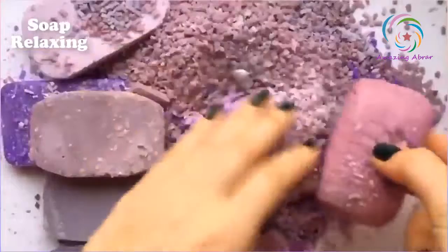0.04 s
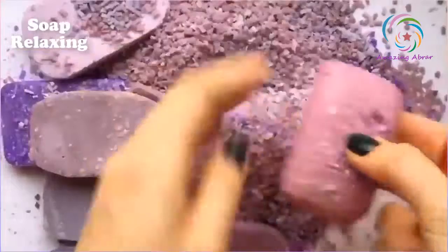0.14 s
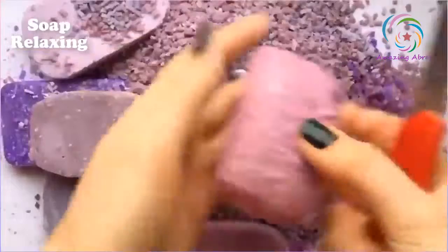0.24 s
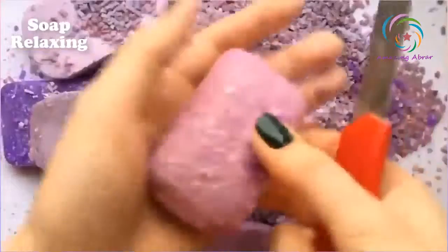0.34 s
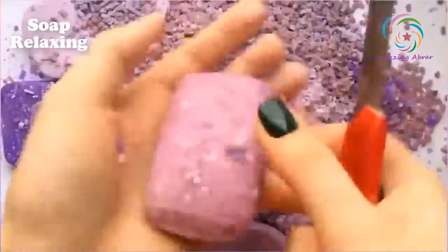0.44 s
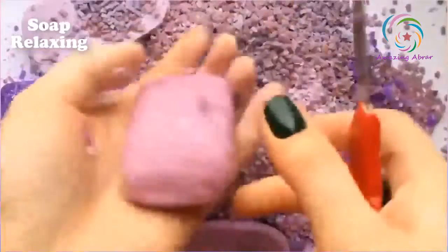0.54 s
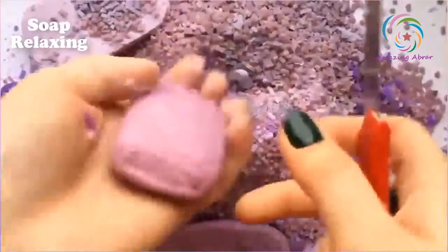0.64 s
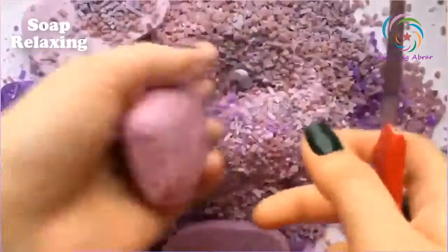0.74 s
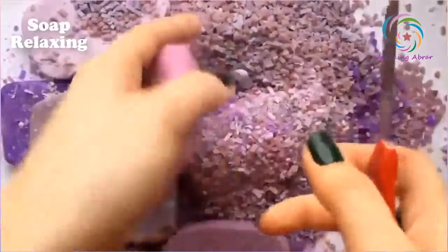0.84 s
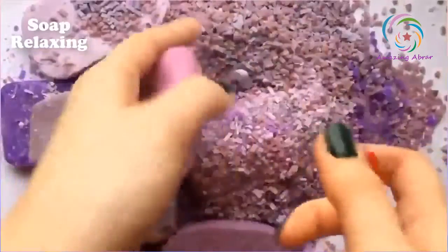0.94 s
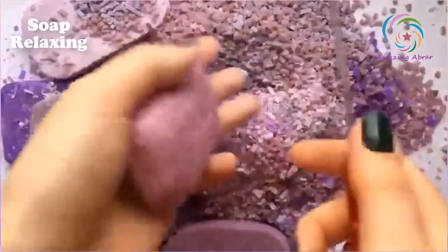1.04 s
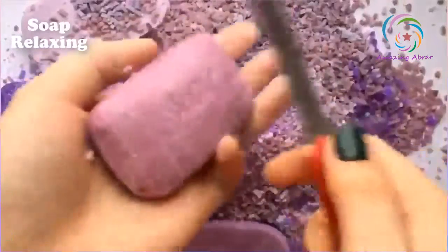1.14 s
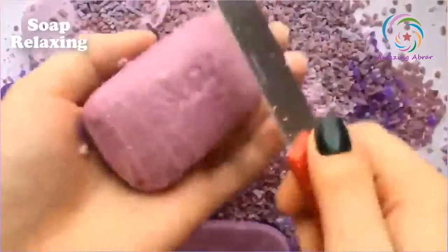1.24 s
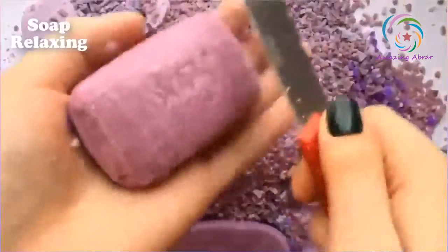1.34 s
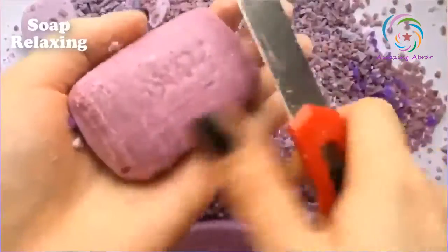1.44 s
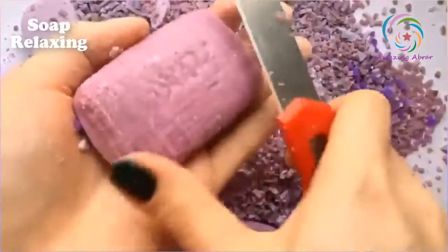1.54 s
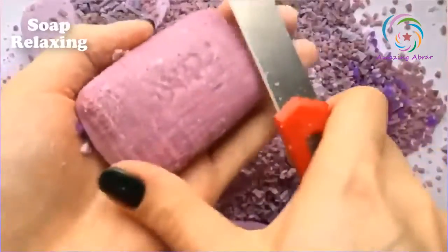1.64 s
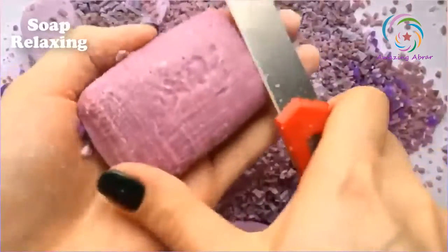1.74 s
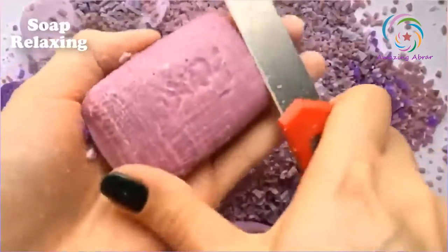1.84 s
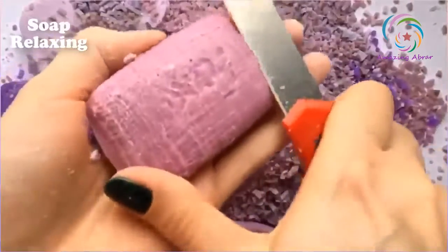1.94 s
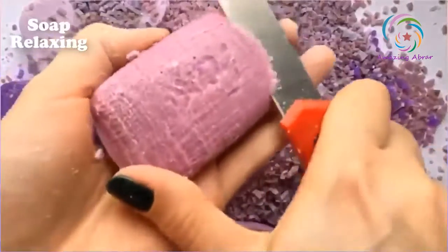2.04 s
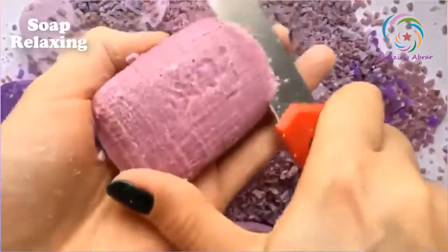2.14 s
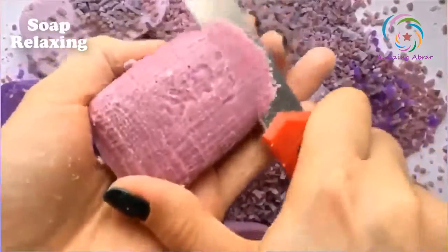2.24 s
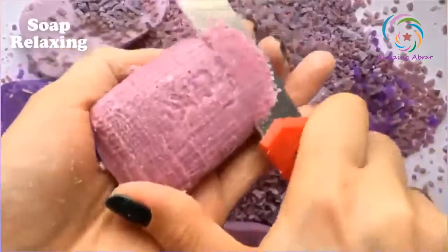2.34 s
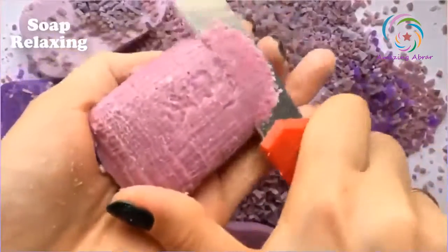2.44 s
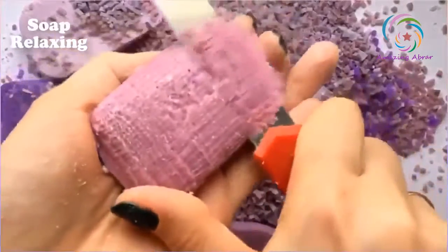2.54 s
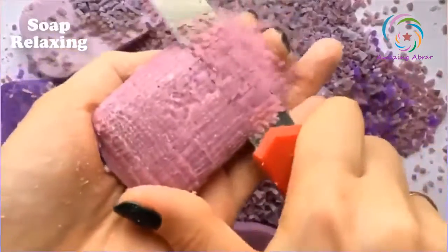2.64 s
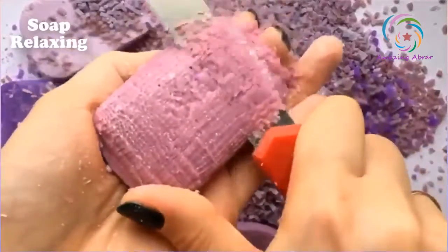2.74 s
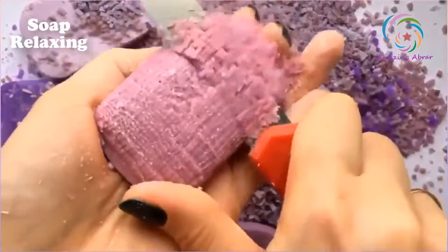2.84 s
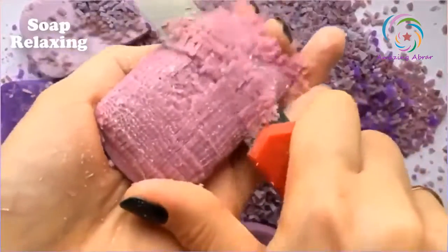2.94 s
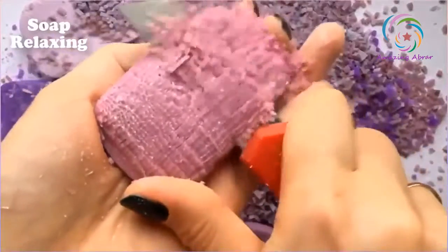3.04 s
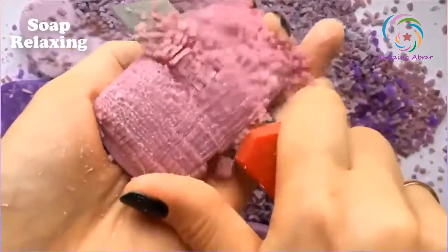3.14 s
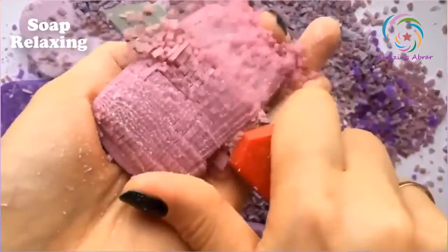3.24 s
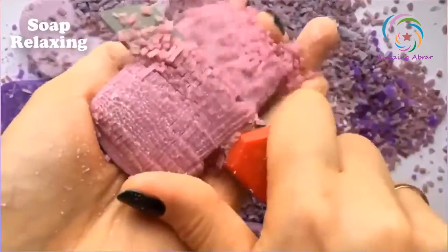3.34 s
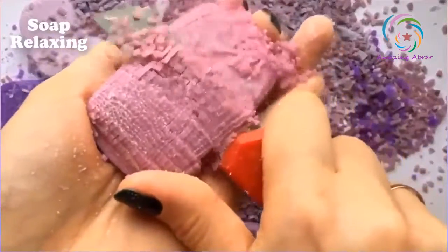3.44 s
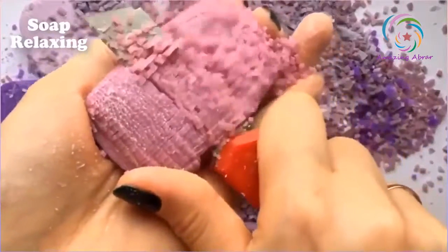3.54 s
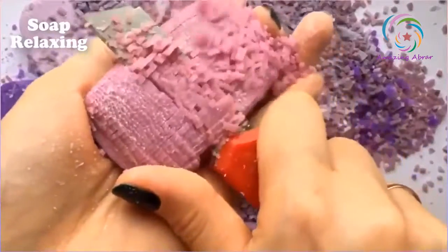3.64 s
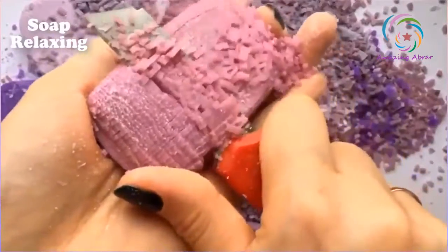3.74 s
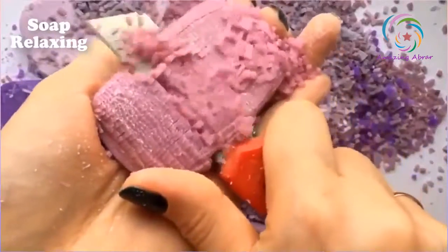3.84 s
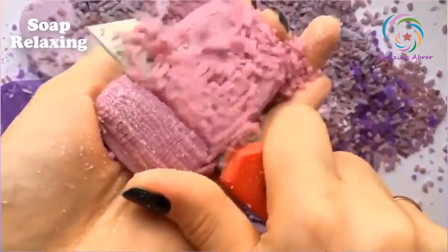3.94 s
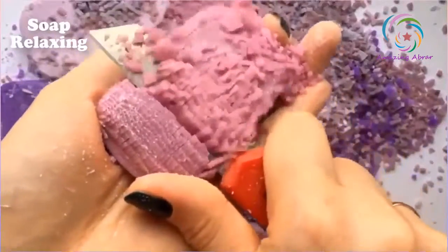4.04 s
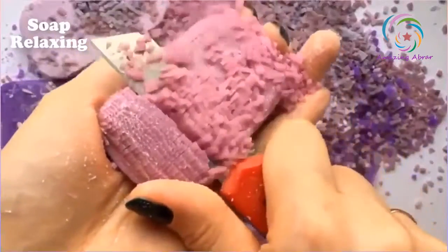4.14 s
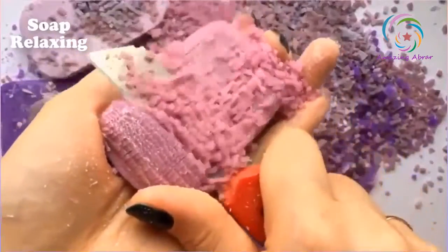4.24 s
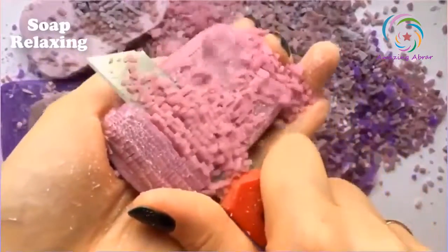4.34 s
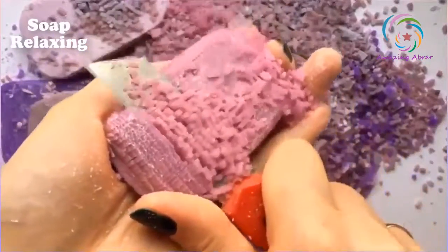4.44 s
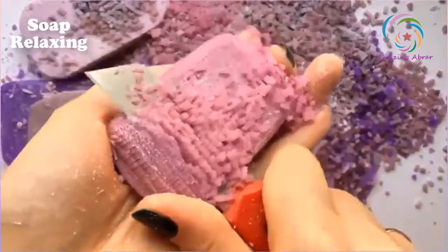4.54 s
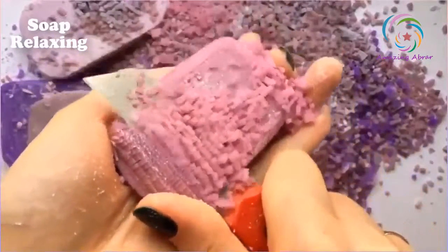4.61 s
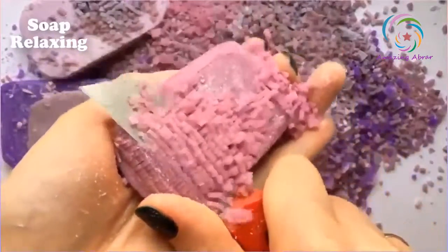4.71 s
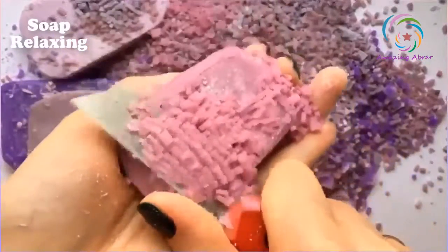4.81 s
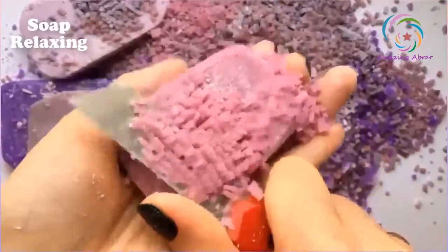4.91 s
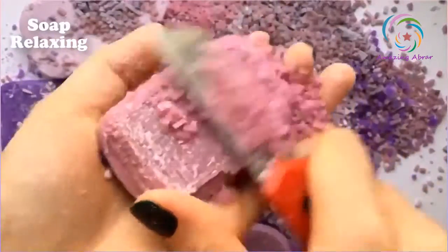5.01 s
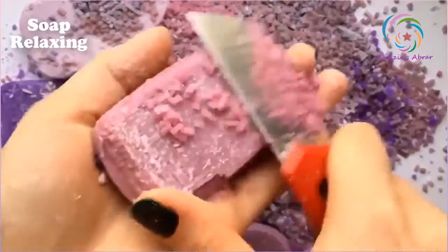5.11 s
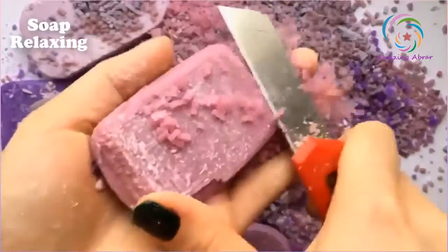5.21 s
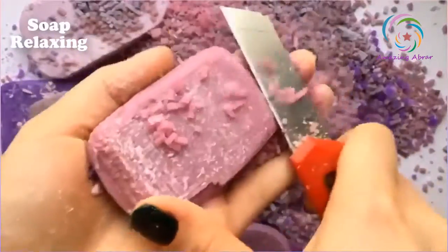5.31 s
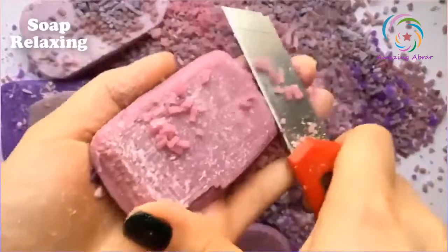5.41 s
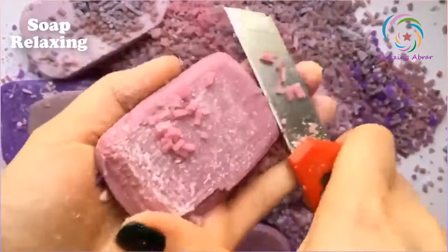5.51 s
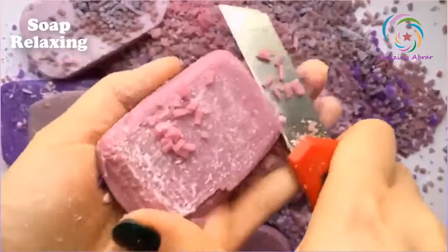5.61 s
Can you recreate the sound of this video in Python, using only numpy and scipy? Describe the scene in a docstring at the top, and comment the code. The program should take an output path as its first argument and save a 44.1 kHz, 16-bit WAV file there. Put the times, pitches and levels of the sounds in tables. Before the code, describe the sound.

Very close, dry recording of hands and soap. Soft skin rubbing, low bumps and small taps come first, then a stuttering scrape as the knife bites in. Dense brittle crunches follow in uneven clusters, thinning out to separate snaps. At the end come a quick blade hiss, sharp taps and trickling crumbs over faint low room noise.

```python
"""A blade is pushed through a dry, cross-scored bar of soap: a fine stick-slip scrape, then crunches
as rows of cubes snap off, built from avalanches of tiny fractures coloured by bar, edge and pieces.
Skin noise, light knocks and damped low bumps come before the cut; a few bumps and knocks return late.
At the end the blade swishes back as hiss in its high modes, and crumbs trickle down as short ticks.
Low filtered room noise lies under it all."""
import sys
import numpy as np
from scipy import signal
from scipy.fft import rfft, irfft
from scipy.io import wavfile

SR = 44100
rng = np.random.default_rng(int(sys.argv[2]) if len(sys.argv) > 2 else 0)


def master_out(mix):
    """Clip the mix to full scale and print it as 16-bit PCM to the path in sys.argv[1]."""
    frames = np.transpose(np.atleast_2d(mix))
    ceiling = np.clip(frames, -1, 1)
    pcm = np.round(ceiling * 32767).astype(np.int16)
    wavfile.write(sys.argv[1], SR, pcm)


N = 250047
TIME = np.arange(N) / SR
FFT_SIZE = 4096
BIN_HZ = np.fft.rfftfreq(FFT_SIZE, 1 / SR)

# Event and curve levels are nominal: some layers carry a further trim.
# Skin sliding on the whole bar. Each row: time in seconds, hiss level in dB, body level in dB.
RUB_BEFORE = [(0, -60, -60), (.11, -67, -55.5), (.2, -59, -49.5), (.38, -70.5, -63.5), (.68, -74, -72),
              (.93, -69, -78), (1.15, -74.5, -74.5), (2.25, -78, -84)]
# Skin sliding on the cut bar. Each row: time in seconds, grit level in dB, body level in dB.
RUB_AFTER = [(5.18, -74, -80), (5.3, -62, -67.5), (5.52, -56.5, -59), (5.67, -63, -62.5)]
# Nails, blade and crumbs knocking on the bar. Each row: middle in seconds, level in dB,
# length in seconds, ring in Hz, body boost in dB.
TAPS = [(0.082, -51, 0.029, 10800, 12), (0.175, -54, 0.017, 980, 46), (.448, -51, 0.0028, 2430, 29),
        (0.549, -61.5, 0.0045, 2400, 28), (0.602, -61.5, 0.019, 2240, 18), (0.795, -49, .0044, 8900, -8),
        (.844, -59, 0.0036, 2250, 19), (1.128, -51, 0.0097, 9400, 16), (1.384, -46, 0.0085, 4400, 6.5),
        (1.454, -53.5, 0.026, 2680, 8), (1.5817, -41.5, 0.0018, 4450, 23), (1.582, -48, .0038, 1230, 13),
        (1.681, -48.5, 0.011, 6640, 14), (1.7626, -51, 0.0065, 7300, 6), (1.805, -56.5, 0.017, 8660, -15),
        (1.9866, -45, 0.0049, 970, 17.5), (2.159, -44, 0.0034, 5830, -12), (5.359, -32, 0.0043, 7260, 5.5),
        (5.4205, -45, 0.0055, 2480, 11), (5.46, -54.5, 0.025, 1700, 29), (5.497, -39.5, 0.0042, 4320, 16.5),
        (5.557, -43, 0.017, 5300, 16.5)]
# Soft bumps of hand and bar. Each row: start in seconds, level in dB, pitch in Hz,
# scuff rms as a share of the swing's peak.
THUMPS = [(.17, -43.5, 304, 0.99), (0.185, -41, 125, 0.31), (.202, -32.5, 232, 0.17),
          (.237, -36.5, 249, 0.3), (4.581, -43.5, 175, 0.46), (4.648, -44.5, 173, 0.15),
          (4.849, -45, 165, 0.079)]
# The edge's first long bite into the bar. Each row: time in seconds, level in dB.
BITE = [(2.23, -80), (2.262, -52), (2.41, -55), (2.445, -44), (2.468, -32.5), (2.54, -28), (2.575, -35.5),
        (2.605, -54)]
# Rows of cubes snapping off. Each row: middle in seconds, level in dB,
# length in seconds (played as 1 ms at least), body boost in dB.
CRUNCHES = [(2.355, -41.5, 0.0024, 9), (2.4235, -35, 0.0062, -3), (2.5834, -27.5, 0.005, -11),
            (2.5927, -29.5, .004, -16), (2.617, -26, 0.0057, -3), (2.707, -35, 0.0023, -10),
            (2.764, -21.5, 0.0062, -2), (2.785, -24.5, 0.012, -0.5), (2.82, -26.5, 0.0097, 3),
            (2.8375, -21.5, 0.01, 3.5), (2.8554, -23, 0.0064, -6), (2.875, -28.5, .014, -0.5),
            (3.0373, -24, 0.0052, 1), (3.0647, -23, 0.0052, -4.5), (3.0767, -22.5, 0.0069, 1.5),
            (3.0913, -30, 0.0079, -2), (3.185, -27, 0.0078, -8.5), (3.205, -25, 0.0043, -12),
            (3.228, -26.5, 0.0065, -2.5), (3.273, -24.5, 0.0084, 3), (3.3162, -31.5, 0.0035, -15),
            (3.3328, -25.5, 0.0037, -6), (3.3424, -25.5, 0.0055, 1.5), (3.359, -26.5, 0.018, 1),
            (3.387, -24, 0.0052, 2.5), (3.481, -28.5, 0.00079, -12), (3.495, -23.5, 0.0065, 1),
            (3.5315, -27.5, 0.017, 2), (3.603, -44.5, 0.022, -6), (3.628, -28.5, 0.0024, -24),
            (3.65, -31.5, 0.011, 2.5), (3.661, -37, 0.0024, 7), (3.72, -20.5, 0.0033, -1.5),
            (3.758, -28, 0.0058, 1), (3.7696, -19.5, 0.0063, 0), (3.7823, -25.5, 0.0037, -1.5),
            (3.9931, -33, 0.0021, -17), (4.02, -41, 0.0049, -5), (4.1172, -25.5, 0.0088, 5),
            (4.1715, -36, .0025, 1), (4.2395, -29, 0.003, -4), (4.2481, -17, 0.0044, -1.5),
            (4.4333, -34.5, 0.002, -22), (4.464, -31, 0.00079, -19), (4.4889, -23.5, 0.0048, 6),
            (4.5093, -31.5, 0.012, 2.5), (4.57, -32, 0.0041, 5), (4.7622, -33, 0.011, 0),
            (4.775, -34.5, 0.0073, 6.5), (4.9065, -33.5, 0.0043, 3), (4.918, -43.5, 0.016, 11),
            (4.966, -47.5, 0.011, 9), (5.102, -41.5, 0.013, 1), (5.162, -45, 0.0018, -3)]
# How the resonances drift as the blade travels. Each row: time in seconds, bar ring in Hz,
# bar ring in dB, edge ring in dB, usual ring of the pieces in Hz.
TRAVEL = [(2.5, 2160, -3, 3.5, 5560), (2.85, 2180, 7, 6, 4570), (3.15, 2220, 8, -3, 4900),
          (4.2, 1730, 12.5, -1.5, 5800), (4.6, 1086, 9, -1.5, 5940)]
# The blade dragging on among loose crumbs. Each row: time in seconds, level in dB.
SCRAPE = [(2.6, -53), (2.7, -66.5), (3.0, -61), (3.15, -56), (3.55, -49), (4.0, -54), (4.7, -59.5),
          (5.1, -53.5), (5.2, -59.5)]

# Colours of skin hiss, skin body, room rumble, knocks, snaps and the dragging blade.
# Each row: frequency in Hz, relative level in dB.
SKIN_HISS = [(900, -14.5), (2400, 3), (4500, 1.5), (7000, 1.5), (9000, 0.5), (12000, -4.5)]
SKIN_BODY = [(80, -4.5), (230, 12), (500, -2), (1000, -5.5), (1600, -9.5), (3000, -11), (8000, -41)]
RUMBLE = [(12, -35), (20, -6), (43, 1), (96, -5), (151, 1), (206, -5.5), (225, -15), (380, -14.5),
          (464, -27), (517, -17.5), (566, -31), (619, -18), (677, -28), (990, -29), (1500, -30.5),
          (1950, -32.5), (3300, -120)]
KNOCK = [(100, -81), (500, -18), (1100, -16.5), (1700, -18), (2500, -6), (4300, 0.5), (6000, -0.5),
         (7200, 0), (8500, -6), (12000, -4.5)]
SNAP = [(60, -29.5), (170, -9.5), (350, -22.5), (700, -16), (1200, -19.5), (2000, -13), (2900, -10),
        (4400, -3.5), (5500, 1.5), (6600, -1.5), (8000, -7), (9900, -4), (10600, -12), (11900, -7.5)]
DRAG = [(150, 9), (400, -1.5), (1200, -5), (2200, 1.5), (3200, -1), (5000, 3.5), (6500, 4.5), (8000, -2),
        (10000, 1.5), (10600, -9), (11900, -3)]
# Steady resonances of the bar, then of the swishing blade.
# Each row: frequency in Hz, width in Hz, height in dB.
BAR_MODES = [(3447, 390, 6), (4340, 440, 4), (6040, 300, -1.5), (6640, 370, 1.5)]
SWISH_MODES = [(7030, 690, -7), (7500, 260, -5), (10000, 700, -17), (11400, 600, -19)]
# Response of the highest treble. Each row: frequency in Hz, gain in dB.
TREBLE_RESPONSE = [(11900, 0), (12150, -5), (12400, -35), (13200, -23), (14200, -35), (14600, -51)]
BAND_LIMIT_HZ = 14982

# The higher a knock rings, the more fizz it has.
TAP_USUAL_HZ, TAP_FIZZ_DB, TAP_FIZZ_DB_PER_OCTAVE = 4400, 1.2, 2.5
THUMP_T60_S = 0.077
# The edge sings in the bite, this far below the bite curve.
SING_DB = -18
# The blade quivers when it jumps free.
QUIVER_S, QUIVER_DB, QUIVER_T60_S = 4.25, -49, 0.41
# The longer a crunch, the more fizz and ring it has; each piece rings a little off the usual pitch.
USUAL_LENGTH_S, PITCH_SCATTER_OCTAVES = 0.0064, 0.18
FIZZ_DB, FIZZ_DB_PER_DOUBLING = 1.9, 2
RING_DB, RING_DB_PER_DOUBLING = 7.5, 0.5
# The bar's lower resonance follows the upper one.
LOW_MODE_SHARE_OF_PITCH, LOW_RING_DB = 0.247, 6.5
# Every crunch sheds crumbs that rustle on: level against the crunch, decay to 1/e.
SHED_DB, SHED_S = -25, 0.02
# The flat of the blade slides back over the cut face, swelling and fading around one moment.
SWISH_S, SWISH_DB, SWISH_RISE_DB_PER_S, SWISH_FALL_DB_PER_S = 5.35, -47.5, 163, 170


def amp(db):
    """Decibels to gain."""
    return 10 ** (np.asarray(db) / 20)


def unit(x):
    """Scales to rms 1."""
    return x / np.sqrt(np.mean(x ** 2) + 1e-20)


def read(points, hz):
    """A colour in dB, joined on a log-frequency axis."""
    f, db = np.transpose(points)
    return np.interp(np.log(hz + 1), np.log(f + 1), db)


def level(rows, axis=1):
    """One dB column of a curve as a gain, practically silent outside its span."""
    rows = np.asarray(rows)
    return amp(np.interp(TIME, rows[:, 0], rows[:, axis], left=-140, right=-140))


def peak(hz, width):
    """A resonance of height 1."""
    return 1 / (1 + (2 * (BIN_HZ - hz) / width) ** 2)


def add(mix, s, sound):
    """Mixes a sound in at time s."""
    part = mix[max(round(s * SR), 0):][:len(sound)]
    part += sound[:len(part)]


def ring(x, db):
    """Passes x through a causal, minimum-phase body with the given dB response."""
    cepstrum = irfft(np.maximum(db, -100) * np.log(10) / 20)
    # folding the cepstrum forward puts all the ringing after the strike
    cepstrum[1:FFT_SIZE // 2] *= 2
    cepstrum[FFT_SIZE // 2 + 1:] = 0
    response = irfft(np.exp(rfft(cepstrum)))
    return signal.fftconvolve(x, response)[:len(x)]


def grains(size, per_s, spread_db, hiss):
    """Tiny fractures of uneven strength over a fine hiss, rms 1."""
    chance, strength = rng.random(size), rng.exponential(1, size)
    fine = rng.standard_normal(size)
    clicks = (chance < per_s / SR) * np.sign(fine) * amp(spread_db * np.minimum(strength, 4))
    return unit(unit(clicks) + hiss * fine)


def crumbs(per_s, spread_db, hiss, decay_s, size=200):
    """Loose specks, each ticking for a moment at its own pitch, over a fine hiss; rms 1."""
    chance, pitch = rng.random(N), rng.uniform(600, 12500, N)
    strength = rng.exponential(1, N)
    at, n = np.flatnonzero(chance < per_s / SR), np.arange(size)
    ticks = np.sin(2 * np.pi * pitch[at, None] * n / SR) * np.exp(-n / SR / decay_s)
    ticks *= amp(spread_db * np.minimum(strength[at, None], 4))
    out = np.bincount((at[:, None] + n).ravel(), ticks.ravel(), N)[:N]
    return unit(unit(out) + hiss * rng.standard_normal(N))


def grip(depth_db, rate_hz):
    """The uneven catch and release of a sliding contact, as a slow random gain."""
    hz = np.fft.rfftfreq(N, 1 / SR)
    slow = irfft(rfft(rng.standard_normal(N)) / (1 + (hz / rate_hz) ** 4), N)
    return amp(depth_db * unit(slow))


def burst(row, colour, per_s, spread_db, skirt_db, skirt_s, ring_db, ring_share):
    """An avalanche of fractures that swells, breaks, and leaves a few stragglers."""
    s, db, length, body_db, fizz_db, ring_hz = row
    t = np.arange(FFT_SIZE) / SR - .02  # zero is the middle of the burst
    length = max(length, .001)
    rise = length * np.clip(length / 0.012, .3, .62)  # the shorter the snap, the more abrupt its start
    avalanche = np.exp(-abs(t / np.where(t < 0, rise, 0.89 * length)) ** 1.4)
    stragglers = amp(skirt_db) * np.exp(-abs(t) / np.where(t < 0, .5 * rise, skirt_s))
    body = body_db / (1 + (BIN_HZ / 2700) ** 4)
    fizz = fizz_db / (1 + (7600 / (BIN_HZ + 1)) ** 8)
    piece = ring_db * peak(ring_hz, ring_share * ring_hz)
    fractures = grains(FFT_SIZE, per_s, spread_db, hiss=0.038) * (avalanche + stragglers)
    sound = ring(fractures, colour + body + fizz + piece)
    # the level holds as if all the energy fell within the length
    return s + t[0], amp(db) * sound * np.sqrt(length * SR / np.sum(sound ** 2))


def rubbing():
    """Skin slides on the whole bar; on the cut bar it rolls gritty crumbs over a low skin body."""
    smooth = unit(ring(rng.standard_normal(N), read(SKIN_HISS, BIN_HZ)))
    specks = crumbs(per_s=2400, spread_db=3.0, hiss=1.0, decay_s=0.002)
    gritty = unit(ring(specks, read(SKIN_HISS, BIN_HZ)))
    body = unit(ring(grains(N, per_s=580, spread_db=3.0, hiss=0.38), read(SKIN_BODY, BIN_HZ)))
    before = amp(1.0) * level(RUB_BEFORE, axis=1) * (smooth + 0.88 * gritty)
    after = amp(2.5) * level(RUB_AFTER, axis=1) * gritty
    low = amp(-3.5) * (level(RUB_BEFORE, axis=2) + level(RUB_AFTER, axis=2)) * body
    return (before + after + low) * grip(depth_db=1.5, rate_hz=120)


def rumble():
    """Low room noise, a little stronger late in the cut while the hands strain."""
    hz = np.fft.rfftfreq(N, 1 / SR)
    colour = amp(read(RUMBLE, hz)) / np.sqrt(1 + (33 / (hz + 1)) ** 8)  # steep low cut at 33 Hz
    noise = unit(irfft(rfft(rng.standard_normal(N)) * colour, N))
    return noise * level([(0, -58.5), (2.3, -60), (2.8, -59.5), (4.6, -56.5), (5.7, -59.5)])


def taps():
    """Light knocks on the bar, each a short burst with its own ring: the higher it is, the more fizz."""
    out = np.zeros(N)
    colour = read(KNOCK, BIN_HZ)
    for s, db, length, ring_hz, body_db in TAPS:
        octaves = np.log2(ring_hz / TAP_USUAL_HZ)
        fizz_db = TAP_FIZZ_DB + TAP_FIZZ_DB_PER_OCTAVE * octaves
        row = s, db, length, body_db, fizz_db, ring_hz
        add(out, *burst(row, colour, per_s=3200, spread_db=4.5, skirt_db=-21.5, skirt_s=0.021,
                        ring_db=11, ring_share=0.25))
    return amp(-.5) * out


def thumps():
    """A damped low swing with a short scuff of skin."""
    out, t = np.zeros(N), np.arange(SR // 4) / SR
    for s, db, hz, share in THUMPS:
        scuff = unit(ring(rng.standard_normal(len(t)), read(SKIN_BODY, BIN_HZ)))
        envelope = amp(db - 60 * t / THUMP_T60_S) * (1 - np.exp(-t / 0.0013))
        add(out, s, envelope * (np.sin(2 * np.pi * hz * t) + share * scuff))
    return out


def travel(s):
    """Bar ring (Hz, dB), edge ring (dB) and piece pitch (Hz) for the cut as far as time s."""
    when, *columns = np.transpose(TRAVEL)
    return [np.interp(s, when, column) for column in columns]


def travel_colour(s):
    """Resonances of bar and edge in dB when the cut has come as far as time s."""
    bar_hz, bar_db, edge_db, _ = travel(s)
    steady = sum(db * peak(hz, width) for hz, width, db in BAR_MODES)
    upper = bar_db * peak(bar_hz, width=330)
    lower = LOW_RING_DB * peak(LOW_MODE_SHARE_OF_PITCH * bar_hz, width=68)
    return steady + upper + lower + edge_db * peak(hz=4890, width=750)


def slips(per_s, unevenness, spread_db, decay_s, held):
    """Stick and slip as a gain of rms 1: the edge jumps at uneven intervals and scrapes on in between."""
    gaps, strength = rng.standard_normal((2, 2000))
    at = (np.cumsum(np.exp(unevenness * gaps)) / per_s * SR).astype(int)
    sizes = amp(spread_db * np.clip(strength, -2, 2))
    jumps = np.bincount(at[at < N], sizes[at < N], N)
    dying = signal.lfilter([1], [1, -np.exp(-1 / (decay_s * SR))], jumps)
    return unit(held + dying)


def bite():
    """The edge sticks and slips as it first bites, crushing fine grains."""
    edge = read(SNAP, BIN_HZ) + travel_colour(TRAVEL[0][0]) + 5 * peak(hz=5000, width=1100)
    crush = unit(ring(crumbs(per_s=4000, spread_db=2, hiss=1.0, decay_s=0.00038), edge))
    stick_slip = slips(per_s=115, unevenness=.28, spread_db=2.0, decay_s=0.0056, held=0.23)
    return amp(0.26) * level(BITE) * stick_slip * crush


def blade():
    """The thin steel sings at the first bite and quivers after the biggest snap: noise in narrow modes."""
    sing = unit(ring(rng.standard_normal(N), 20 * np.log10(peak(hz=11850, width=54))))
    quiver = unit(ring(rng.standard_normal(N), 20 * np.log10(peak(hz=4060, width=420))))
    dying = (TIME > QUIVER_S) * amp(QUIVER_DB - 60 * abs(TIME - QUIVER_S) / QUIVER_T60_S)
    return amp(SING_DB) * level(BITE) * sing + dying * quiver


def crunches():
    """Each row of cubes breaks away in one short avalanche and knocks the bar at a new spot."""
    out = np.zeros(N)
    for s, db, length, body_db in CRUNCHES:
        knock = 7 * peak(500 * 4 ** rng.random(), width=91)  # a dull note somewhere within two octaves
        colour = read(SNAP, BIN_HZ) + travel_colour(s) + knock
        doublings = np.log2(length / USUAL_LENGTH_S)
        piece_hz = travel(s)[-1] * 2 ** (PITCH_SCATTER_OCTAVES * rng.standard_normal())
        fizz_db = FIZZ_DB + FIZZ_DB_PER_DOUBLING * doublings
        ring_db = RING_DB + RING_DB_PER_DOUBLING * doublings
        row = s, db, length, body_db, fizz_db, piece_hz
        add(out, *burst(row, colour, per_s=6500, spread_db=2.5, skirt_db=-15.5, skirt_s=0.011,
                        ring_db=ring_db, ring_share=0.19))
    return amp(1.01) * out


def scrape():
    """Deeper in, the blade drags among loose crumbs, most of all just after a crunch."""
    specks = crumbs(per_s=2000, spread_db=6.0, hiss=1.0, decay_s=0.00045)
    drag = unit(ring(specks, read(DRAG, BIN_HZ)))
    shed_power = np.zeros(N)
    for s, db, *_ in CRUNCHES:
        rustle = amp(db + SHED_DB) * np.exp(-abs(TIME - s) / SHED_S)
        shed_power += (TIME > s) * rustle ** 2
    loudness = np.hypot(amp(-4) * level(SCRAPE), np.sqrt(shed_power))
    return loudness * grip(depth_db=1.5, rate_hz=79) * drag


def trickle():
    """Larger crumbs drop off the bar in sparse ticks as the blade lifts away."""
    specks = crumbs(per_s=120, spread_db=5.5, hiss=.05, decay_s=0.0021)
    drops = unit(ring(specks, read(KNOCK, BIN_HZ)))
    return amp(-0.3) * level(RUB_AFTER, axis=1) * drops


def swell(s, db, rise_db_per_s, fall_db_per_s):
    """A gain that climbs to its top at time s and dies away."""
    return amp(db - np.maximum((s - TIME) * rise_db_per_s, (TIME - s) * fall_db_per_s))


def swish():
    """The flat of the blade hisses in its high modes."""
    modes = sum(amp(db) * peak(hz, width) for hz, width, db in SWISH_MODES)
    stroke = swell(SWISH_S, SWISH_DB, SWISH_RISE_DB_PER_S, SWISH_FALL_DB_PER_S)
    return stroke * unit(ring(rng.standard_normal(N), 20 * np.log10(modes)))


def room(x, t60, wet_db):
    """A short, faint and slightly dull tail from the table and walls; wet_db is set before its colour."""
    t = np.arange(SR // 2) / SR
    tail = grains(len(t), per_s=1700, spread_db=2.0, hiss=0.16) * amp(-60 * t / t60) * (t > .004)
    colour = read([(300, 12.5), (2200, 5.5), (5500, -2.5), (11000, 1.0)], BIN_HZ)
    tail = ring(tail / np.linalg.norm(tail), colour)
    return x + amp(wet_db) * signal.fftconvolve(x, tail)[:N]


def scene():
    """All sources close by with their short tail, over the rumble."""
    handling = rubbing() + taps() + thumps()
    cutting = bite() + blade() + crunches() + scrape()
    ending = trickle() + swish()
    return (room(handling + cutting + ending, t60=0.21, wet_db=-17.5) + rumble())[None]


def record(dry):
    """The highest treble falls away unevenly, then stops at the band limit."""
    hz = np.fft.rfftfreq(N, 1 / SR)
    dull = irfft(rfft(dry) * amp(read(TREBLE_RESPONSE, hz)), N)
    lowpass = signal.firwin(511, BAND_LIMIT_HZ, window=("kaiser", 9), fs=SR)
    return signal.oaconvolve(dull, lowpass[None], "same")


dry = scene()
out = record(dry)
master_out(out)
```